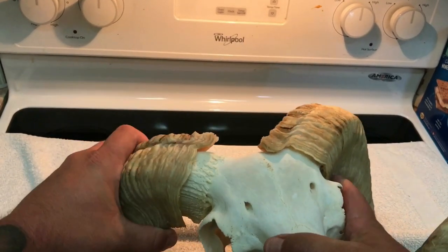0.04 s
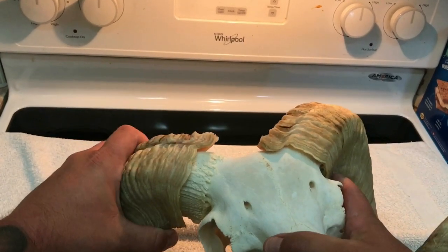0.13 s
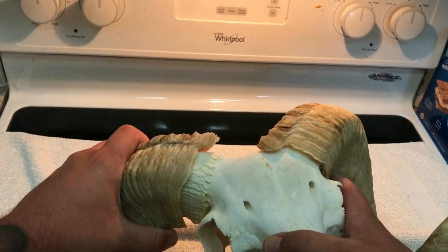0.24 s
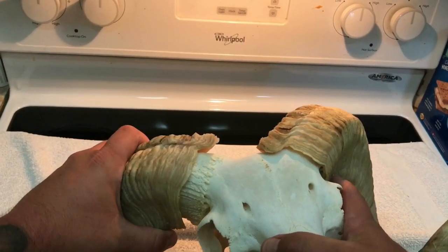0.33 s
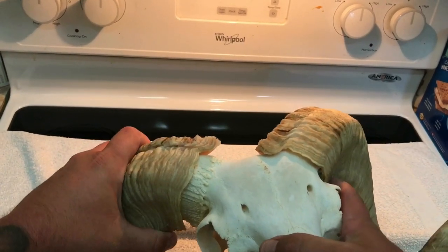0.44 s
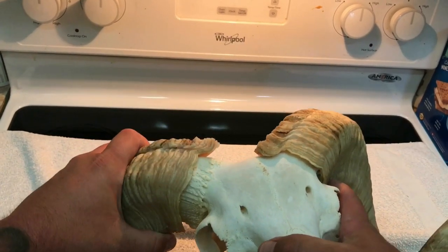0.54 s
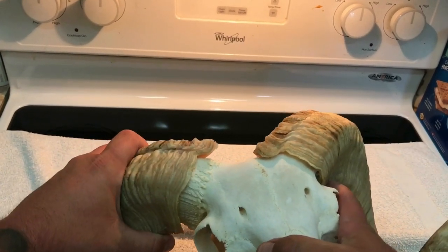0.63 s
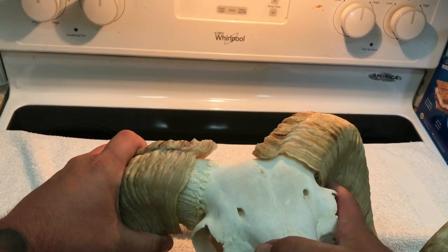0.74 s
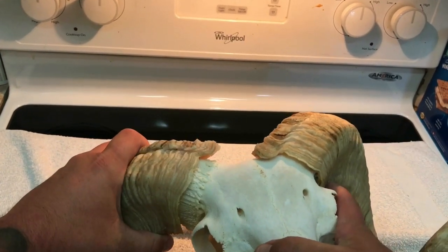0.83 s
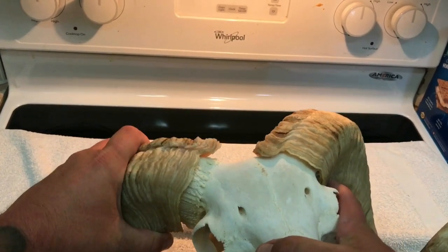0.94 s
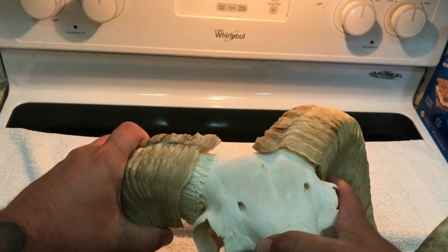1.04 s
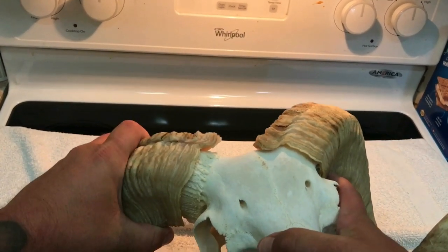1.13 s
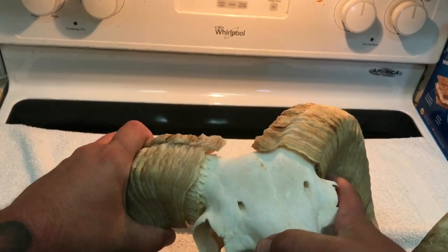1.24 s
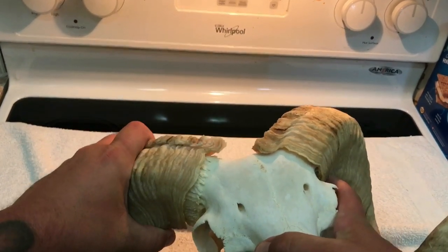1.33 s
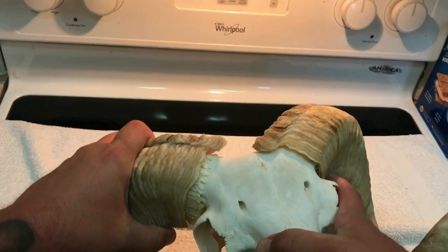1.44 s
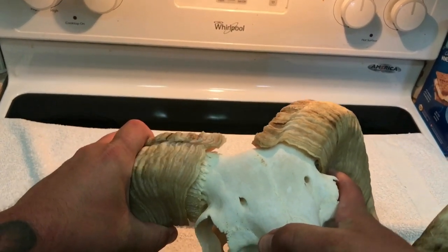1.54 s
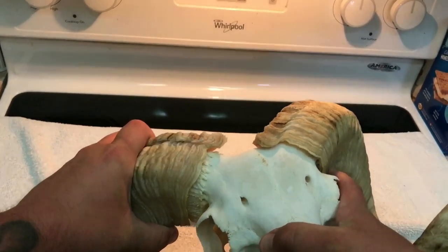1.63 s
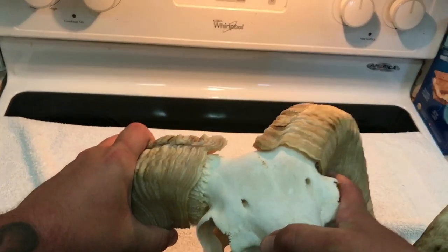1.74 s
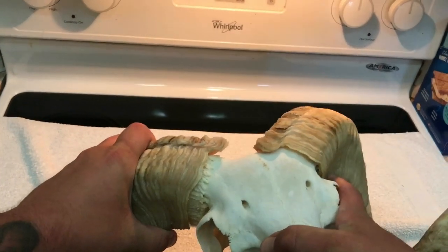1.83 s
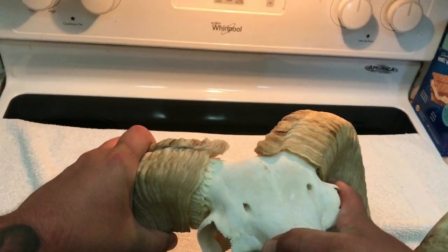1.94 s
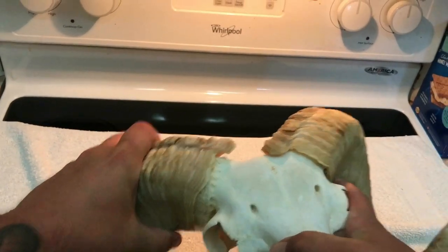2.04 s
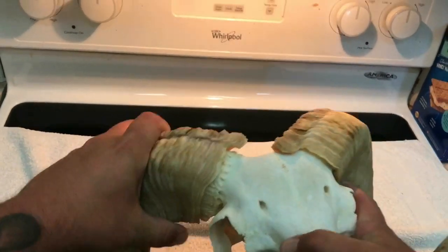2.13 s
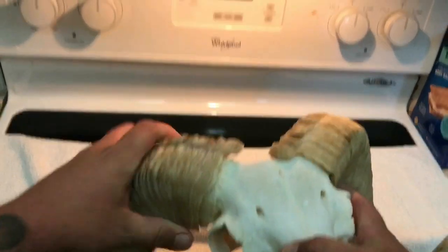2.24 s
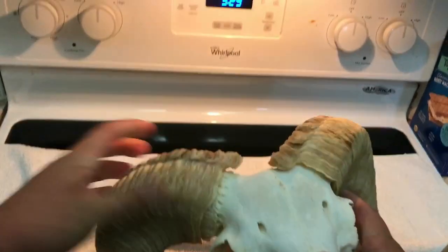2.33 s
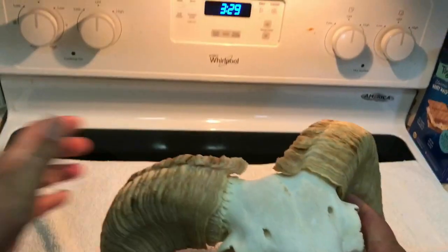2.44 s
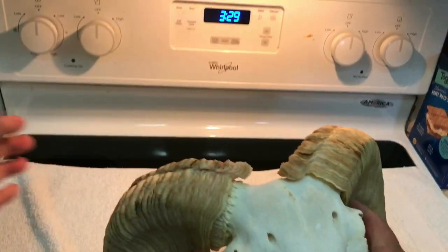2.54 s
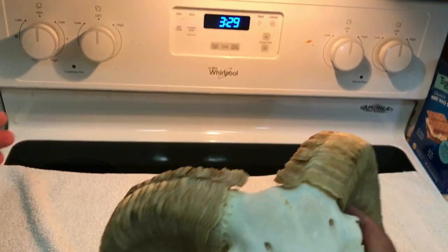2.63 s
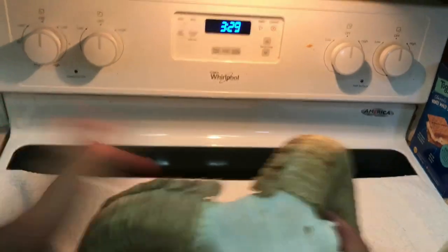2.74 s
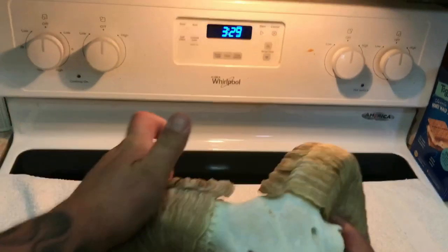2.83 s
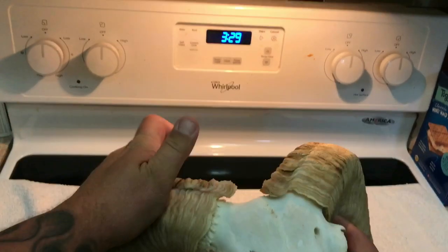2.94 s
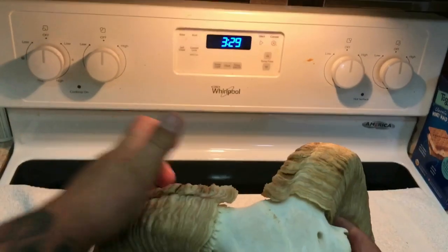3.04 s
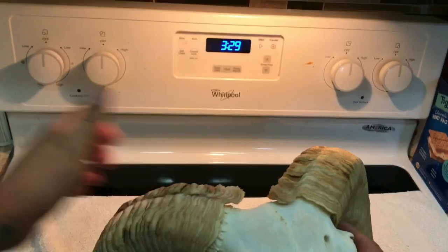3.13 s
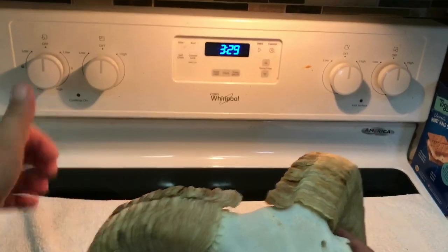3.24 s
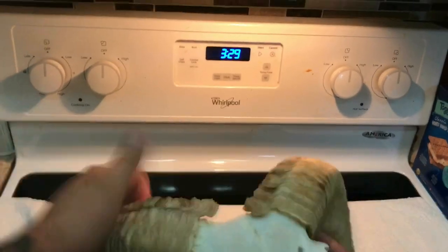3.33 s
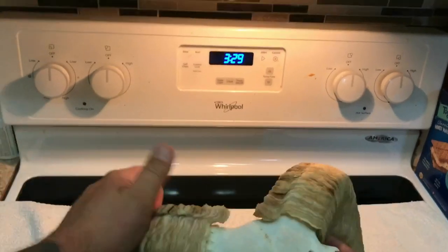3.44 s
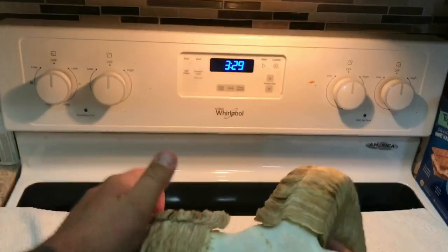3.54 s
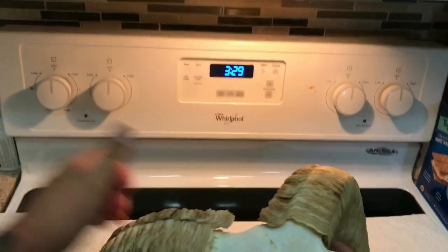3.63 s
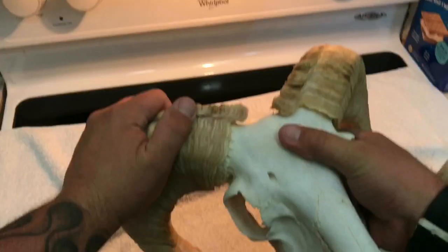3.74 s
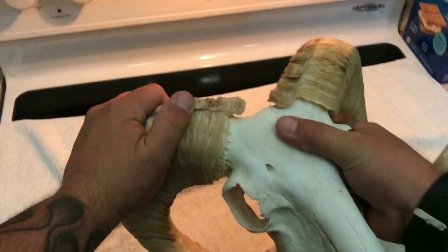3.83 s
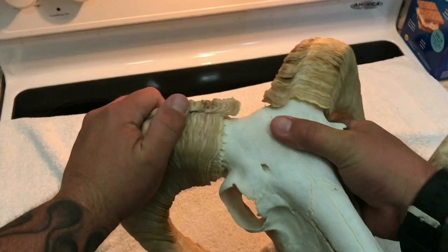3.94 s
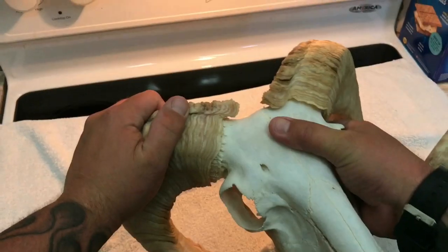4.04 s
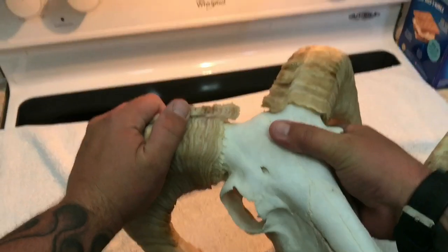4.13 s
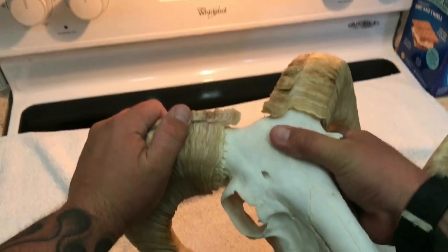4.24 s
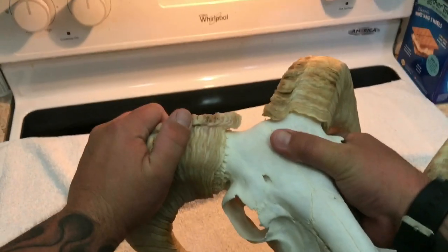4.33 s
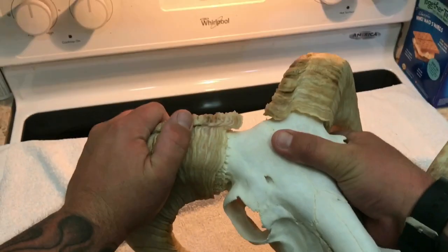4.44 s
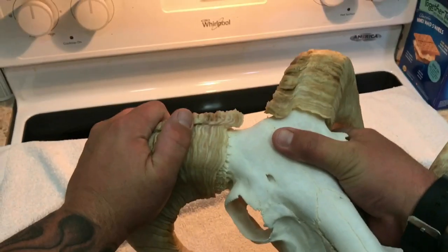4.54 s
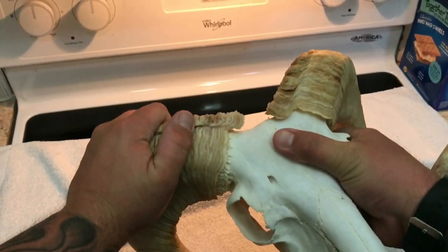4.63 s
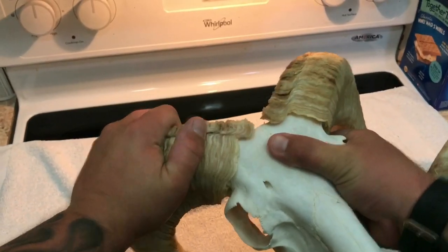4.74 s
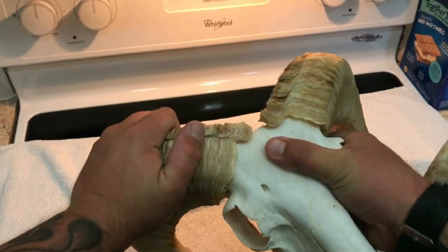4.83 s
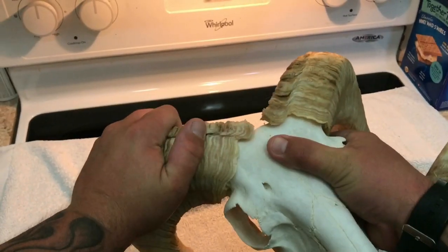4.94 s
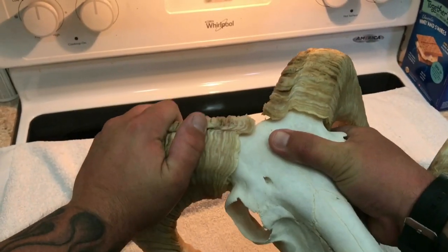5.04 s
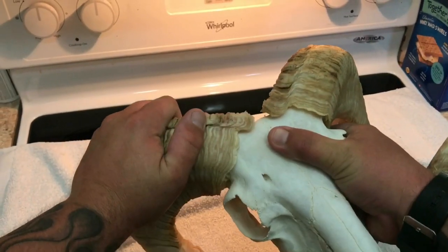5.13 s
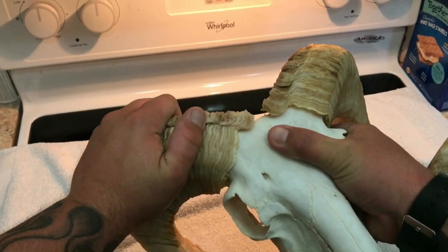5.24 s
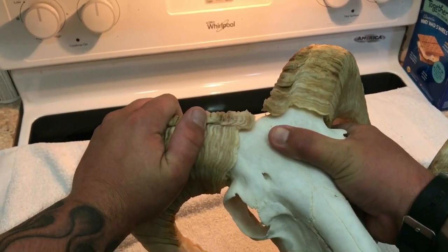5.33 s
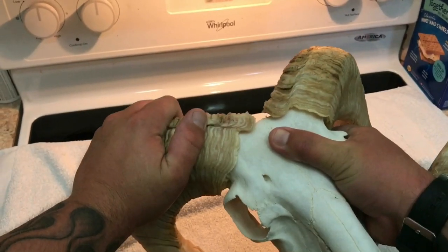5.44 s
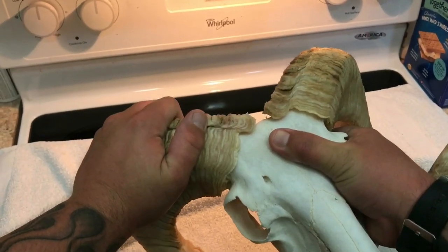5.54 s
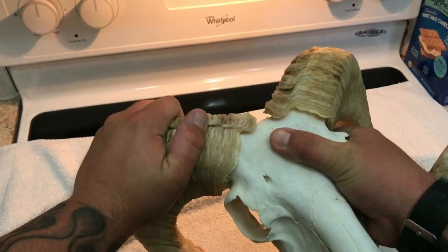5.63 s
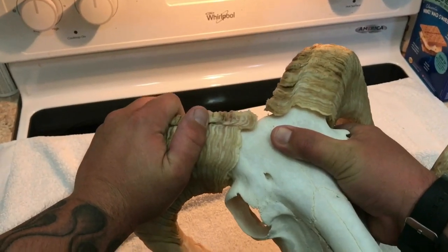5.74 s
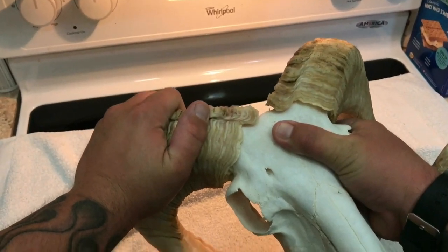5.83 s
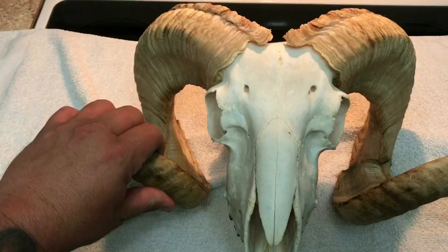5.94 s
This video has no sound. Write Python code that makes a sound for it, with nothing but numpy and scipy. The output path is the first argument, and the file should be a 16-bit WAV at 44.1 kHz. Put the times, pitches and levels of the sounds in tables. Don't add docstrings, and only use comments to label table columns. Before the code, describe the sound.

Small gritty scrapes and ticks, two sharp palm blows on a horned skull, a brief rattle, then a seating knock above a humming refrigerator.

```python
import sys
import numpy as np
from scipy import signal
from scipy.fft import rfft, irfft, next_fast_len
from scipy.io import wavfile
from scipy.ndimage import map_coordinates

SR = 44100
rng = np.random.default_rng(int(sys.argv[2]) if len(sys.argv) > 2 else 0)


def rack_gain(trim_db):
    fader = np.asarray(trim_db, float)
    return 10 ** (fader / 20)


def wav_out(sig):
    wavfile.write(sys.argv[1], SR, np.round(np.clip(np.atleast_2d(sig).T, -1, 1) * 32767).astype(np.int16))


N = 264600
T = np.arange(N) / SR


def unit(x):
    return x / np.sqrt(np.mean(x ** 2) + 1e-20)


def along(points, hz):
    f, v = np.transpose(points)
    return np.interp(np.log(hz + 1), np.log(f + 1), v)


def filtered(x, response):
    m = next_fast_len(N + SR // 2)
    return irfft(rfft(x, m) * response(np.fft.rfftfreq(m, 1 / SR)), m)[..., :N]


def shaped_noise(level_db):
    return unit(filtered(rng.standard_normal(N), lambda hz: rack_gain(level_db(hz))))


def resonances(modes):
    def response(f):
        total = 0
        for k, (center_hz, width_hz, db) in enumerate(modes):
            damping = 1j * f * width_hz
            total = total + (-1) ** k * rack_gain(db) * damping / (center_hz ** 2 - f * f + damping)
        return total
    return response


def wobble(rate_hz):
    return map_coordinates(rng.standard_normal(int(N * rate_hz / SR) + 4), [T * rate_hz])


def friction(strokes, body, lumpy_db):
    # frequency in Hz, grit level in dB per Hz.
    grit_spectrum = [(1500, -57), (3000, 0), (6000, 3), (8000, -1), (10500, 1), (13000, -2), (16000, -10)]
    grit_power, body_power, t = np.zeros(N + SR), np.zeros(N + SR), T[:SR]
    for start_s, rise_s, hold_s, t60_s, grit_db, body_db in strokes:
        decay_s = np.maximum(t - rise_s - hold_s, 0)
        rise = np.clip(t / max(rise_s, 1e-4), 0, 1) ** 2
        force = rise * rack_gain(grit_db - 60 * decay_s / max(t60_s, 0.01))
        first = round(start_s * SR)
        grit_power[first:][:SR] += force ** 2
        body_power[first:][:SR] += (force * rack_gain(body_db)) ** 2
    lumps = unit(rack_gain(lumpy_db * wobble(900) + 0.26 * wobble(60)))
    grit = shaped_noise(lambda hz: along(grit_spectrum, hz))
    push = rng.standard_normal(N)
    response = resonances(body)
    steady_rms = np.std(filtered(push, response))
    ring = filtered(push * lumps * np.sqrt(body_power[:N]), response) / steady_rms
    return grit * lumps * np.sqrt(grit_power[:N]) + ring


def catch_strokes(rows):
    rise_s, t60_s, t60_per_hold = 0.0009, 0.031, 2.4
    return [(s, rise_s, hold_s, t60_s + t60_per_hold * hold_s, db, body_db) for s, hold_s, db, body_db in rows]


def horn_slips():
    # start in seconds, hold in seconds, grit in dB, bone body minus grit in dB.
    sudden = [(.252, .011, -76, 1), (.335, .006, -73, 1), (.374, 0.012, -80.5, 9), (.517, 0.025, -67.5, 8),
              (.916, 0.016, -56, 3), (1.372, .0014, -50.5, -2), (1.4535, .002, -60, -3),
              (2.108, .0022, -55.5, 5), (2.396, .0016, -72, -15), (2.8885, 0.002, -38, 7),
              (3.115, .024, -66, 2.5), (3.157, .013, -72.5, 6), (3.376, 0.013, -82, 10),
              (3.4555, .0044, -60, 12), (3.461, 0.0035, -34, 0.5), (3.471, .014, -39, -0.5),
              (4.551, .003, -59, -3), (4.722, .0022, -61.5, 4), (4.751, .003, -67, 6),
              (4.832, 0.0032, -61.5, 18.5), (4.848, .013, -48, 6.5), (5.497, .004, -88, -3)]
    # start in seconds, length in seconds, grit in dB, bone body minus grit in dB.
    rubs = [
        (0.043, 0.02, -72.5, 3),
        (0.096, .026, -75.5, 7),
        (1.344, .022, -52, 9),
        (2.173, 0.032, -70, 4.5),
        (2.222, 0.044, -74.5, 5),
        (2.324, 0.038, -60.5, -3.5),
        (3.745, .03, -75.5, -15),
    ]
    # start in seconds, rise in seconds, grit in dB, bone body minus grit in dB.
    surges = [
        (2.892, 0.0046, -37, 10),
        (3.69, .013, -65, 5),
        (3.708, 0.011, -58, -3.5),
        (4.858, 0.0096, -40.5, 11.5),
        (4.867, 0.0062, -31, 7),
    ]
    # start, hold and t60 in seconds, grit in dB, bone body minus grit in dB.
    settles = [
        (2.109, .013, .088, -73.5, 12.5),
        (2.269, .01, 0.44, -70, 4),
        (2.901, 0.049, .14, -47, -1.5),
        (3.5, 0.028, 0.51, -63.5, 3.5),
    ]
    snap_settle = (4.885, .01, .38, -61, 11)
    # frequency in Hz, width in Hz, level in dB.
    bone = [(303, 154, -1), (582, 205, 5.5), (1110, 530, 0), (1590, 145, 1.5), (2320, 1740, -3.5),
            (4740, 1040, -6), (5700, 1030, -11.5)]
    rub_rise_share, rub_t60_per_length = 0.43, 3.1
    surge_hold_s, surge_t60_s, settle_rise_s = 0.0029, 0.044, 0.0047

    strokes = catch_strokes(sudden)
    for s, span_s, db, body_db in rubs:
        rise_s = rub_rise_share * span_s
        strokes.append((s, rise_s, span_s - rise_s, rub_t60_per_length * span_s, db, body_db))
    for s, rise_s, db, body_db in surges:
        strokes.append((s, rise_s, surge_hold_s, surge_t60_s, db, body_db))
    for s, *rest in [*settles, snap_settle]:
        strokes.append((s, settle_rise_s, *rest))
    return friction(strokes, bone, lumpy_db=1.0)


def horn_twist():
    # Start, rise, hold and t60 in seconds.
    twist_shape_s = (4.4, .17, .14, .25)
    # start in seconds, hold in seconds, grit in dB, sheath minus grit in dB.
    small_catches = [
        (4.42, 0.076, -85.5, 9.5),
        (4.621, .004, -77, 1),
        (4.775, .003, -72, 5),
        (4.79, .002, -79, -3),
    ]
    # frequency in Hz, width in Hz, level in dB.
    sheath = [(1480, 640, -2), (2680, 1300, 0), (4300, 2400, -5.5), (6540, 2500, -7.5)]
    grit_db, sheath_db = -75.5, 10.5
    strokes = [(*twist_shape_s, grit_db, sheath_db)] + catch_strokes(small_catches)
    return friction(strokes, sheath, lumpy_db=2.5)


def skull_blows():
    # start in seconds, level in dB, softness in seconds, hollow and stove top minus knock in dB.
    hits = [
        (2.898, -15.5, 0.00096, -1.5, -14),
        (2.902, -28.5, 0.00061, -14, -15),
        (2.9159, -28.5, 0.00061, -14, -20),
        (3.4564, -29, 0.00044, -17, -19),
        (3.463, -28.5, 0.00027, -7, -20),
        (3.468, -47.5, 0.0053, 11, 29.5),
        (4.833, -40, 0.00037, -20, -16),
        (4.8759, -24.5, 0.00078, -2, -28),
        (4.891, -41, 0.00065, 7.5, -5),
    ]
    # frequency in Hz, level in dB, t60 in seconds.
    loose_wall = [(516, 1.5, 0.032), (640.5, -7, 0.066), (1263, -8.5, 0.037), (1562, -8, 0.044)]
    seated_wall = [(375, -3.5, .1), (552, -6, 0.073), (704, -8, 0.093), (885, -7.5, 0.1), (1118, -2, 0.043),
                   (2133, -0.5, 0.027)]
    cavities = [(223, 3.5, 0.036), (169, -1.5, 0.053)]
    stove_top = [(61.4, -1.5, 0.15)]
    seat_s, low_cut_hz = 4.5, 35
    out, t = np.zeros(N + SR), T[:SR // 2]

    def ring(modes):
        return sum(rack_gain(db - 60 * t / t60_s) * np.sin(2 * np.pi * hz * t) for hz, db, t60_s in modes)

    for s, db, soft_s, hollow_db, stove_db in hits:
        wall = ring(loose_wall if s < seat_s else seated_wall)
        body = wall + rack_gain(hollow_db) * ring(cavities) + rack_gain(stove_db) * ring(stove_top)
        onset = 1 - np.exp(-t / max(soft_s, 1e-4))
        out[round(s * SR):][:len(t)] -= rack_gain(db) * onset * body
    return filtered(out[:N], lambda hz: (1j * hz / (low_cut_hz + 1j * hz)) ** 2)


def part_rattles():
    # start in seconds, length in seconds, grit in dB, ring minus grit in dB.
    shakes = [
        (3.824, 0.028, -70, 10.5),
        (3.852, 0.0085, -52.5, 14.5),
        (3.885, .03, -78, 1),
        (3.94, 0.013, -62, 5.5),
        (3.954, 0.046, -76.5, 17.5),
        (3.994, 0.017, -60.5, 10),
    ]
    # frequency in Hz, width in Hz, level in dB.
    part_modes = [(1960, 230, -1), (2650, 250, -10), (3270, 320, 14.5), (4500, 350, -21), (5200, 250, -0.5),
                  (6550, 300, -1), (8040, 900, -6)]
    rise_share, t60_s = 0.47, 0.039
    strokes = [(s, rise_share * span_s, (1 - rise_share) * span_s, t60_s, db, ring_db)
               for s, span_s, db, ring_db in shakes]
    return friction(strokes, part_modes, lumpy_db=1.5)


def kitchen_echo(x):
    # frequency in Hz, t60 in seconds.
    decay_times = [(200, 0.35), (2000, 0.51), (12000, 0.2)]
    hz, t, z = signal.stft(rng.standard_normal(SR // 2), SR, nperseg=256)
    decay = rack_gain(-60 * t / along(decay_times, hz)[:, None])
    tail = signal.istft(z * decay, SR, nperseg=256)[1]
    return signal.fftconvolve(np.pad(x, (150, 0)), tail / np.linalg.norm(tail))[:N]


def compressor():
    # frequency in Hz, level in dB rms; the first line takes its level from drone_db instead.
    orders = [(59.2, -51.5), (118.4, -61.5), (236.9, -64), (355.3, -67), (393.0, -74), (532.9, -77),
              (646.0, -75.5), (942.1, -80), (1061, -77.5)]
    beat_s, beat_peak_s, drone_db, neighbour_db = 2.85, 1.51, -53, -6

    def line(hz):
        return np.sqrt(2) * np.sin(2 * np.pi * hz * T + 0.37 * wobble(4.0))

    hum = sum(rack_gain(db + 0.83 * wobble(5)) * line(hz) for hz, db in orders[1:])
    beat = np.abs(1 + rack_gain(neighbour_db) * np.exp(2j * np.pi * (T - beat_peak_s) / beat_s))
    return hum + rack_gain(drone_db + 0.96 * wobble(3)) * beat * line(orders[0][0])


def room_air():
    # frequency in Hz, level in dB per Hz.
    rumble = [(12, -50), (25, -44), (41, -10.5), (60, 0.5), (85, -3), (100, -9.5), (150, -14), (221, -9.5),
              (265, -14.5), (400, -17.5), (450, -23), (1000, -30), (1600, -35.5), (2600, -53)]
    air_db, air_top_hz, air_drop_db = -51, 3500, -30
    air = shaped_noise(lambda hz: along(rumble, hz) + air_drop_db * (hz > air_top_hz))
    return rack_gain(air_db + 0.65 * wobble(1.47)) * air


def microphone_hiss():
    # frequency in Hz, level in dB per Hz.
    hiss_spectrum = [(1470, -30), (2500, 0), (3030, -5), (3340, -2), (3580, -6), (4410, -6), (4870, -9),
                     (5590, -6), (10500, -12), (12700, -10), (15600, -11)]
    hiss_db = -75
    hiss = shaped_noise(lambda hz: along(hiss_spectrum, np.minimum(hz, 15500)))
    return rack_gain(hiss_db + 0.1 * wobble(6.0)) * hiss


def scene():
    horn = horn_slips() + horn_twist() + skull_blows()
    part = part_rattles()
    echo = kitchen_echo(rack_gain(-19.0) * horn + rack_gain(-19.5) * part)
    background = compressor() + room_air() + microphone_hiss()
    return (horn + part + echo + background)[None]


def band_limit(x):
    return signal.sosfilt(signal.butter(12, 16830, fs=SR, output="sos"), x)


def record(dry):
    # frequency in Hz, gain in dB.
    port = [(7000, 0), (7900, -2), (9400, 1), (10500, -4), (11600, 1), (16000, 0)]
    change_s, fade_out_s, fade_in_s, dip_db = 3.826, 0.023, 0.022, -18.5
    gain_db, top_hz = 1.9, 15900
    dip = np.interp(T, [change_s - fade_out_s, change_s, change_s + fade_in_s], [0, 1, 0])
    faded = dry * rack_gain(gain_db + dip_db * dip)
    mix = filtered(faded, lambda hz: rack_gain(along(port, hz)) * (hz < top_hz))
    return band_limit(mix)


dry = scene()
out = record(dry)
wav_out(out)
```